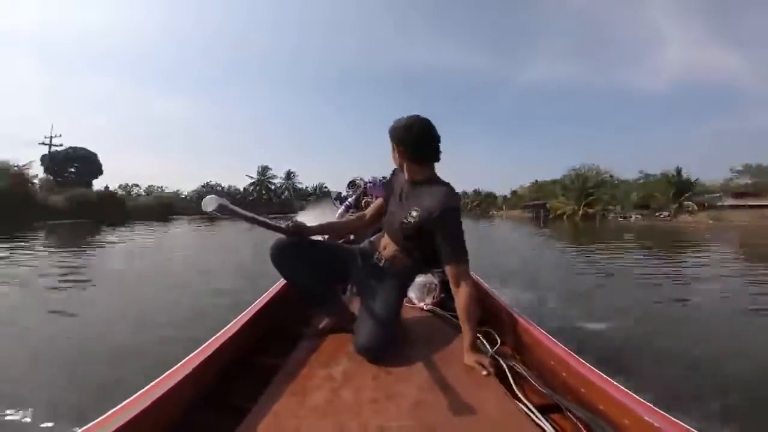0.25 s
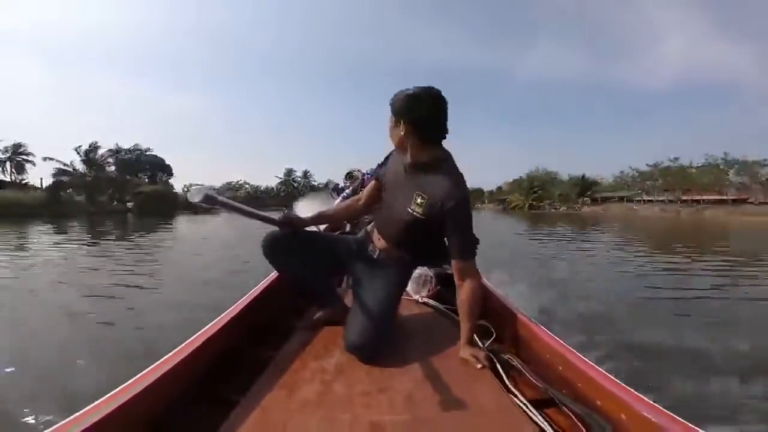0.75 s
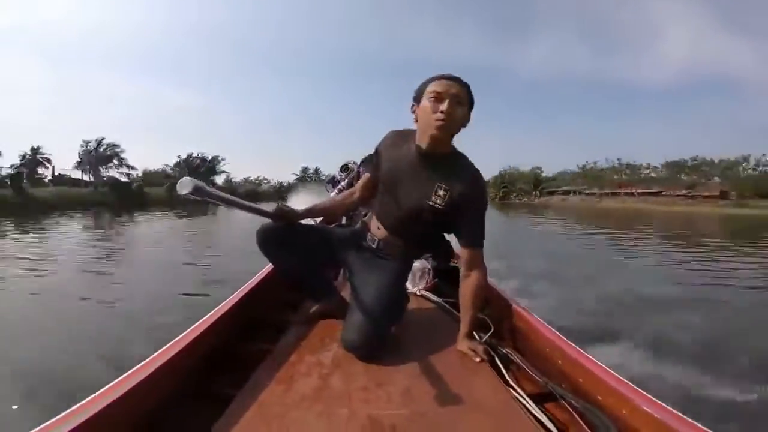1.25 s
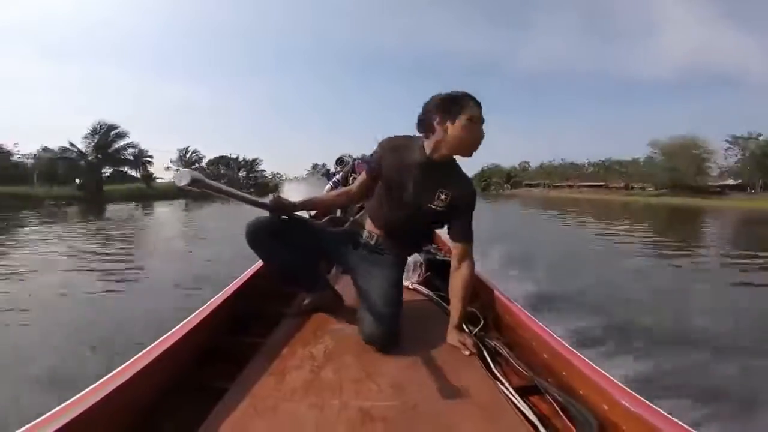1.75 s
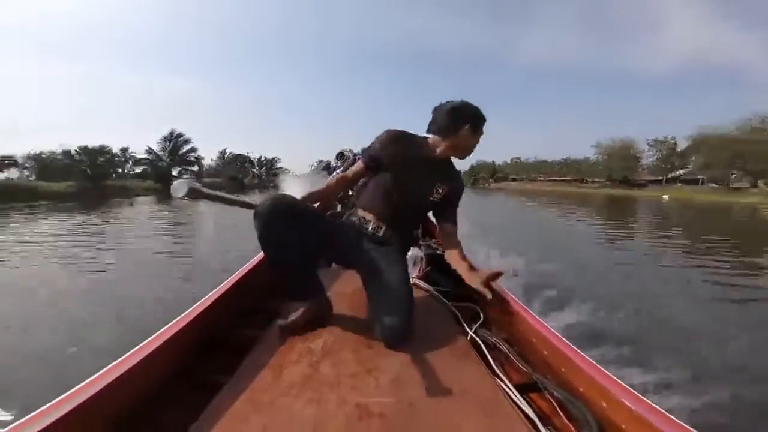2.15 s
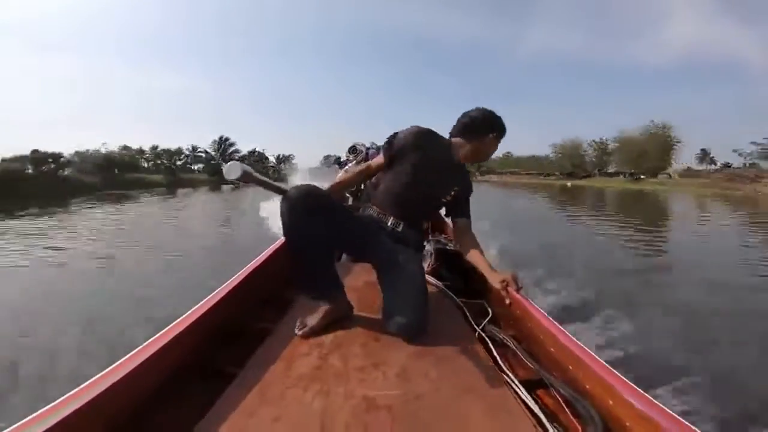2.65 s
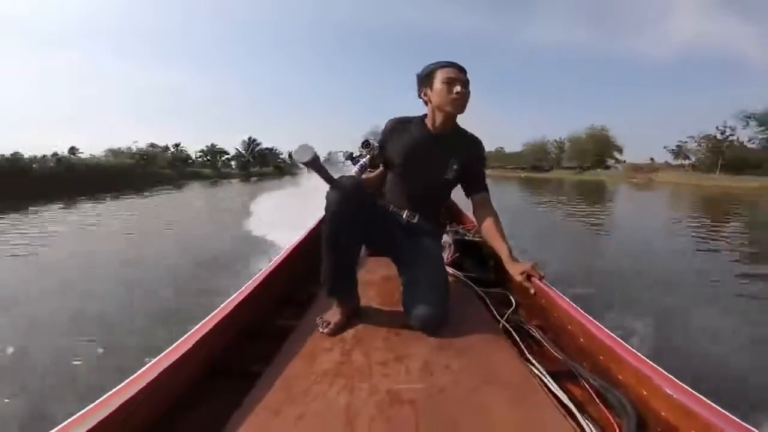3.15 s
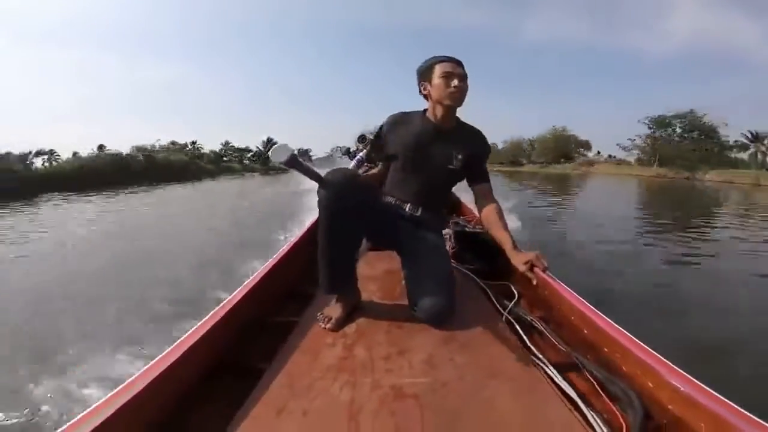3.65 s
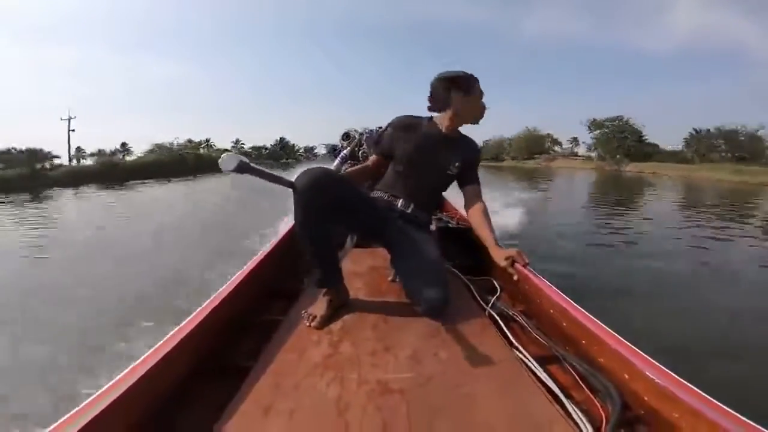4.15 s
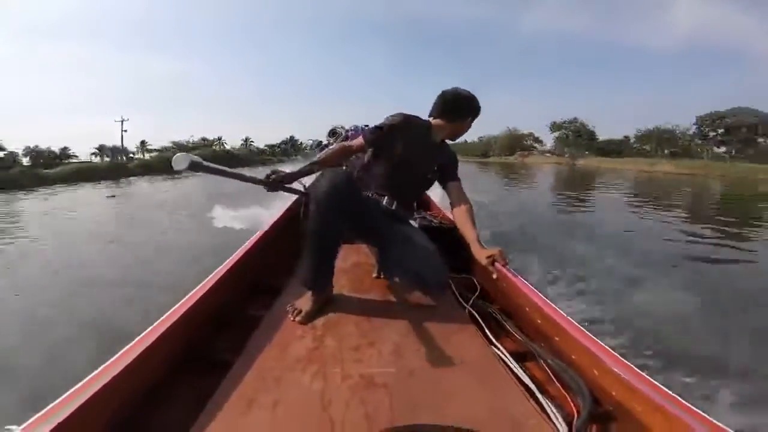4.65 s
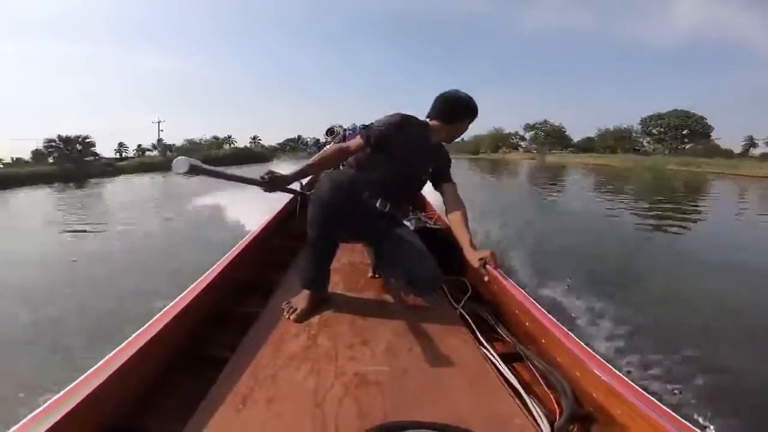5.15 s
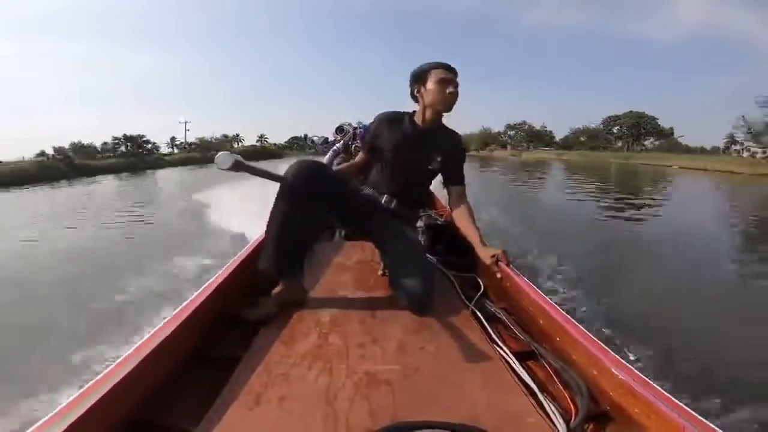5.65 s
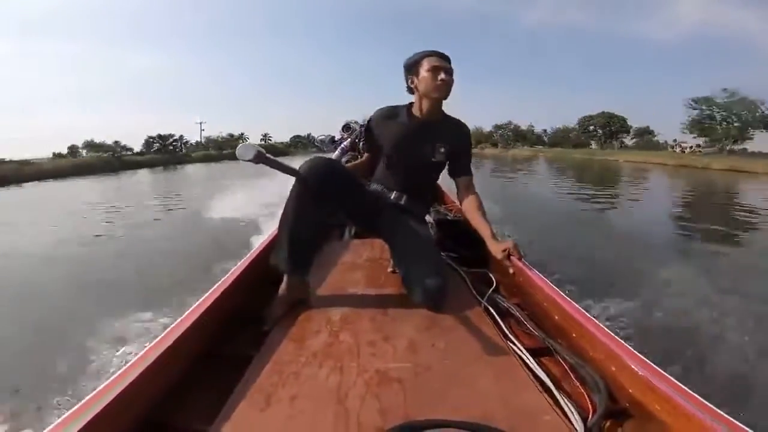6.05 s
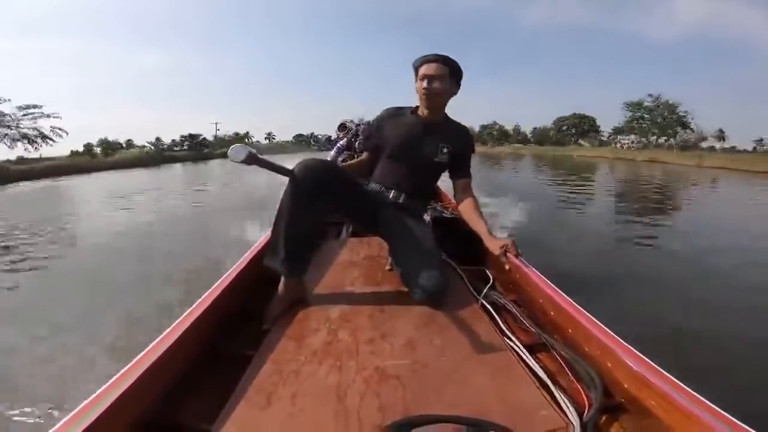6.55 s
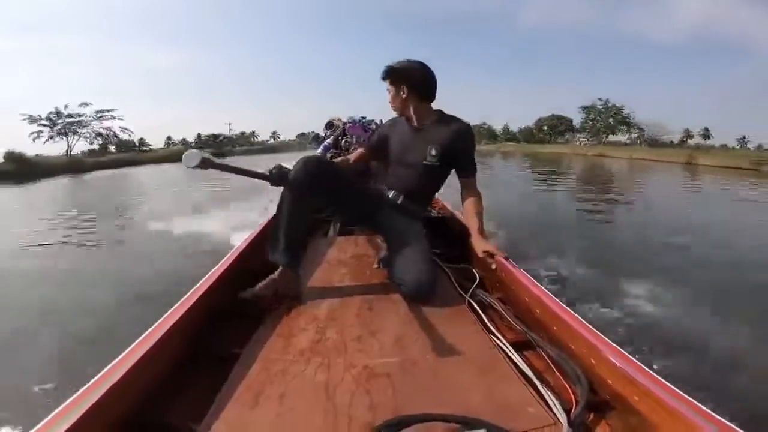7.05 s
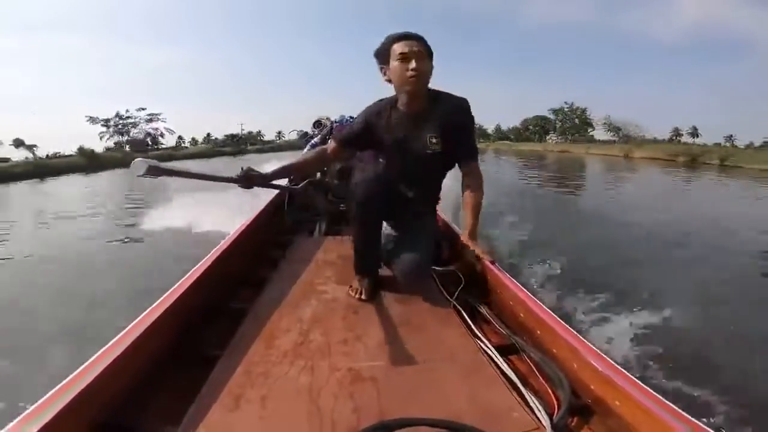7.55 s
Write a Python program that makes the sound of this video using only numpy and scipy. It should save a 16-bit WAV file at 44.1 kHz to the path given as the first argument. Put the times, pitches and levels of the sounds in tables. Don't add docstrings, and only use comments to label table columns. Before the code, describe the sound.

Outdoors on open water, the microphone sits a boat's length from the engine. Bright spray and sharp splashes fade to a steady rush while a whistling turbo coasts down. Then come about ten throbbing throttle blips, separated by gaps, with high airy whistles flaring and sagging. Low wind buffeting fills the pauses and ducks under the louder bursts.

```python
import sys
import numpy as np
from scipy import signal
from scipy.fft import rfft, irfft
from scipy.io import wavfile
from scipy.ndimage import uniform_filter1d

SR = 44100
rng = np.random.default_rng(int(sys.argv[2]) if len(sys.argv) > 2 else 0)


def store_wav(level_fs):
    pcm = np.round(np.clip(np.atleast_2d(level_fs), -1, 1) * 32767)
    wavfile.write(sys.argv[1], SR, pcm.T.astype(np.int16))


def magnitude_from_level(level_db):
    exponent = np.asarray(level_db, float) / 20
    return 10 ** exponent


N = 343539

# [time_s, level_db]
WIND_DOWN = [(.6, -39), (.84, -35), (1.08, -31.5), (1.54, -39), (1.8, -43.5), (2.33, -48), (2.43, -39.5),
             (2.75, -51.5), (2.95, -46)]
# [start_s, peak_s, peak_pitch_hz, climbing_level_db, lingering_level_db]
SPOOLS = [(2.94, 3.08, 5600, -45, -46), (3.19, 3.327, 6100, -40, -51), (3.578, 3.79, 6810, -41.5, -46),
          (4.12, 4.293, 6400, -40.5, -43), (4.678, 4.8, 5830, -52, -48), (5.538, 5.65, 5436, -43, -51),
          (5.961, 6.137, 5436, -41, -45), (6.31, 6.551, 5905, -39.5, -45), (6.72, 6.9, 5950, -37.5, -40),
          (7.03, 7.204, 5850, -34.5, -38), (7.48, 7.793, 5350, -37.5, -40)]
# [time_s, pitch_hz, level_db]
LARGE_WHEEL = [(3, 3190, -48), (3.14, 3260, -51), (3.64, 3610, -52), (3.78, 3970, -40.5), (4.02, 3790, -49),
               (4.07, 3660, -35), (4.3, 3765, -34), (4.5, 3575, -42.5), (4.6, 3500, -49.5),
               (5.65, 2943, -53), (5.9, 2994, -42), (6.12, 3100, -48.5), (6.35, 3123, -39.5),
               (6.6, 3100, -52), (6.8, 3576, -44), (7.1, 3290, -48), (7.5, 3120, -49.5), (7.79, 3140, -46)]
# [time_s, share_0_to_1]
LARGE_WHEEL_SMEAR = [(1.5, 0.66), (2.9, 0.4), (4.1, 0.4), (5.6, 0.65), (6.3, .75), (7.0, 1), (7.4, 0.48),
                     (7.79, .45)]
# [start_s, length_s, first_firing_hz, last_firing_hz, second_order_level_db]
BLIPS = [
    (2.862, 0.15, 76.3, 79.4, -23),
    (3.12, 0.25, 65.6, 83.3, -19.5),
    (3.58, .22, 72.9, 80.55, -20),
    (4.661, 0.15, 62.3, 68.7, -29),
    (5.42, 0.22, 55, 68.85, -24),
    (5.862, .29, 55.3, 72.7, -22),
    (6.292, .28, 57.84, 74.8, -21),
    (6.659, .24, 64.3, 73.5, -20.5),
    (7.039, 0.18, 59.3, 69.4, -24),
    (7.429, 0.35, 54.07, 63.8, -25.5),
]
# [frequency_hz, gain_db]
PIPE = [(40, 7.5), (70, 8), (135, 3), (205, 0.5), (270, -14.5), (400, -28.5), (560, -41.5), (760, -26),
        (1000, -47.5)]
# [frequency_hz, gain_db]
HULL_BOOM = [(55, -10), (63, -1), (78, -3.5), (84, 1.5)]
# [time_s, spray_level_db]
CHURN = [(0, -23), (.3, -27.5), (.7, -30.5), (1.15, -33.5), (1.6, -36), (2.2, -39.5), (2.86, -42),
         (3.45, -41), (3.78, -36), (4.0, -39), (4.35, -37), (4.9, -39.5), (5.42, -41.5), (6.09, -35),
         (6.5, -35), (6.72, -36.5), (7.15, -35), (7.79, -37)]
# [time_s, peak_level_db, time_to_fall_30_db_s]
SPLASHES = [(0.0962, -8.5, 0.021), (0.1984, -23, 0.036), (0.3461, -29, 0.2), (0.4663, -39, 0.037),
            (0.5851, -14, 0.03), (0.6848, -28, 0.04), (0.7724, -22, 0.025), (1.0869, -27, 0.028),
            (1.2306, -38, 0.03), (1.4994, -24, 0.025), (1.9954, -26.5, 0.041), (3.3189, -31, 0.036),
            (3.7394, -29, 0.032), (4.2617, -22, 0.025), (5.5694, -33, 0.063), (6.5101, -28, 0.045),
            (6.762, -51, 0.05), (7.1586, -28, 0.051), (7.5727, -22, 0.023)]
SLAPS_S = [
    1.03,
    1.55,
    5.02,
]
# [start_s, length_s, level_db]
MISTS = [
    (3.1, .75, -70),
    (5.3, 1., -69),
    (6.5, .1, -76),
    (7.2, .6, -70),
]
# [frequency_hz, density_db_per_hz]
RUSH = [(420, -36), (500, 0), (660, -3.5), (735, 3.5), (830, -3.5), (950, 2), (1300, -0.5), (1600, -2.5),
        (2500, -3), (3000, -4), (3700, -4.5), (5000, -12), (6500, -35.5)]
SPRAY = [(1470, -38.5), (2500, -15.5), (3390, -10.5), (3980, -1), (4350, -4.5), (6110, 3.5), (7000, -4),
         (7500, -7), (8250, -12), (10700, -36), (18200, -120)]
FIZZ = [(8520, -34), (8620, 4), (9500, -1.5), (10600, -2.5), (10750, -13), (11300, -21.5)]
TOP_FIZZ = [(10600, -34), (10750, 3.5), (12000, -4.5), (13300, -6), (13700, -13), (14500, -23),
            (15400, -45)]
MIST = [(10600, -28.5), (11500, -1), (13000, -0.5), (15000, -6.5), (15700, -25)]
# [time_s, rumble_level_db, large_eddy_level_db]
WIND = [(0, -15.5, -16), (.55, -16.5, -17.5), (.85, -15.5, -16), (1.1, -12.5, -18), (1.6, -14, -18.5),
        (2.3, -13, -22.5), (3.0, -13.5, -21.5), (3.3, -15, -18), (3.66, -14, -25), (4.1, -15.5, -19),
        (4.55, -19, -23), (4.7, -14, -24.5), (5.4, -19, -24.5), (6.25, -16.5, -17.5), (6.6, -18.5, -18.5),
        (7.1, -15.5, -23), (7.42, -18.5, -31), (7.79, -12, -20)]
# [start_s, length_s, level_db]
GUSTS = [(.45, 0.77, -39.5), (1.39, 0.8, -38.5), (2.702, 0.31, -41), (3.52, .5, -40), (4.317, .03, -40),
         (4.585, 0.039, -44), (4.839, 0.26, -45), (5.57, .05, -44.5), (6.2, 0.18, -39), (6.606, 0.022, -37),
         (6.776, .03, -39), (7.05, .15, -42), (7.65, .15, -37.5)]
# [frequency_hz, density_db_per_hz]
BUFFET = [(5, -36), (9, -23), (20, -6.5), (30, 6), (38, 2), (50, 1), (65, -13), (90, -8.5), (120, -54)]
RUMBLE = [(29, -47.5), (50, -0.5), (147, -0.5), (210, -8), (275, -17), (310, -17.5), (330, -38),
          (430, -57.5), (730, -120)]
FLAP = [(270, -18), (310, -3.5), (360, -2), (410, -2.5), (480, -16.5), (560, -8.5), (620, -50)]
# [frequency_hz, width_hz, depth_0_to_1]
NOTCHES = [(557, 79, 0.6), (569, 24, 0.6), (1006, 44, 0.4), (1133, 217, 0.66), (1116, 24, 0.48)]
# lower_hz, upper_hz
EDGE_HZ = (8280, 8600)

COAST_HZ, COAST_REST_HZ, COAST_PER_S = 7815, 987, 0.472
SAG_REST_HZ, SAG_PER_S, BLADE_RATIO = 3500, 0.59, 1.66
FLARE_DB_PER_S, FADE_DB_PER_S, SETTLE_DB_PER_S, IDLE_DB = 152, 69, 6, -52
SMEAR_COASTING, SMEAR_SPOOLING, HARD_HZ_PER_S = 0.42, 0.9, 1700
OPENING_DB = -6
CALM_DB = -39.5
RUSH_DB, RUSH_SHARE, FIZZ_DB, FIZZ_SHARE, TOP_DB, TOP_SHARE = -40, 0.3, -73, 0.2, -82, 0.15
RUSH_KICK_DB, RUSH_KICK_DB_PER_S, MIST_EDGE_DB_PER_S = 2, 17, 51
VENT_FIZZ_DB, VENT_TOP_DB, VENT_HOLD_S, VENT_DB_PER_S = -52.5, -60.5, 0.3, 22.5
BUFFET_LUMPS_DB, FLAP_DB, FLAP_LUMPS_DB, FLAP_EDGE_DB_PER_S = 2.8, -46.5, 0.2, 89


def turbo():
    t, first, last = np.arange(N) / SR, WIND_DOWN[0], WIND_DOWN[-1]
    coast_hz = COAST_REST_HZ + (COAST_HZ - COAST_REST_HZ) * np.exp(-COAST_PER_S * (t - first[0]))
    high_hz = BLADE_RATIO * coast_hz
    for start, peak, peak_hz, *_ in SPOOLS:
        rise = np.interp(t, [start, peak], [np.interp(start, t, high_hz), peak_hz])
        sag = SAG_REST_HZ + (peak_hz - SAG_REST_HZ) * np.exp(-SAG_PER_S * (t - peak))
        high_hz = np.where(t < start, high_hz, np.where(t < peak, rise, sag))
    climb_hz_per_s = np.gradient(high_hz) * SR
    smear = np.interp(climb_hz_per_s, [0, HARD_HZ_PER_S], [SMEAR_COASTING, SMEAR_SPOOLING])

    flare_db = loudest([(s, peak, db) for s, peak, _, db, _ in SPOOLS], FLARE_DB_PER_S, FADE_DB_PER_S)
    settled_db = loudest([(peak, peak, db) for _, peak, _, _, db in SPOOLS], FLARE_DB_PER_S, SETTLE_DB_PER_S)
    high_db = np.maximum(np.maximum(flare_db, settled_db), IDLE_DB)
    high_db = high_db + held(last[0], N / SR, 0, 150, 0)

    coasting = t < LARGE_WHEEL[0][0]
    low_hz, low_db = along(LARGE_WHEEL)
    coast_db = along(WIND_DOWN)[0] + held(first[0], N / SR, 0, 120, 0)
    low_hz = np.where(coasting, coast_hz, low_hz)
    low_db = np.where(coasting, coast_db, low_db)
    low = blade(low_hz, low_db, along(LARGE_WHEEL_SMEAR)[0], waver=0.0012, throb_db=1.7, smear_hz=120)
    high_smear = uniform_filter1d(smear, size=2000)
    return low + blade(high_hz, high_db, high_smear, waver=0.0025, throb_db=2.2, smear_hz=160)


def blade(hz, level_db, smear, waver, throb_db, smear_hz):
    smear = np.clip(smear, 0, 1)
    turn = np.exp(2j * np.pi * np.cumsum(hz * (1 + waver * wobble(32.0))) / SR)
    air = wobble(smear_hz) + 1j * wobble(smear_hz)
    tone = np.sqrt(2 * (1 - smear)) + np.sqrt(smear) * air
    throb = throb_db * (wobble(45) + 0.45 * wobble(8.4))
    return magnitude_from_level(level_db + throb) * (turn * tone).real


def exhaust():
    out, unrest, uneven = np.zeros(N), wobble(17), wobble(43)
    for start, length, first_hz, last_hz, db in BLIPS:
        at = np.arange(round(start * SR), min(round((start + length) * SR), N))
        done = (at / SR - start) / length
        hz = first_hz + (last_hz - first_hz) * done
        level_db = db + OPENING_DB * (1 - done)
        turns = np.cumsum(hz * (1 + 0.01 * unrest[at])) / SR + rng.random()
        orders = [magnitude_from_level(read(PIPE, k * hz)) * np.cos(2 * np.pi * k * turns) for k in range(1, 15)]
        boom = magnitude_from_level(np.interp(hz, *np.transpose(HULL_BOOM)))
        pulses = boom * orders[0] + sum(orders[1:])
        swell = magnitude_from_level(level_db + 0.55 * uneven[at]) * signal.windows.tukey(len(at), 0.3)
        out[at] -= np.sqrt(2) * swell * pulses
    return out


def water():
    spray_db = along(CHURN)[0]
    churn_db = spray_db - CALM_DB
    shoves = [row[0] + row[1] for row in BLIPS] + list(SLAPS_S)
    kick_db = loudest([(s, s, RUSH_KICK_DB) for s in shoves], RUSH_KICK_DB_PER_S, RUSH_KICK_DB_PER_S)
    rush_db = RUSH_DB + RUSH_SHARE * churn_db + np.maximum(kick_db, 0)
    vent_db = held(0, VENT_HOLD_S, 0, 0, VENT_DB_PER_S)
    mist_spans = [(s, s + length, db) for s, length, db in MISTS]
    mist_db = loudest(mist_spans, MIST_EDGE_DB_PER_S, MIST_EDGE_DB_PER_S)
    fizz_db = np.maximum(FIZZ_DB + FIZZ_SHARE * churn_db, VENT_FIZZ_DB + vent_db)
    top_db = np.maximum(TOP_DB + TOP_SHARE * churn_db, VENT_TOP_DB + vent_db)

    flare = np.zeros(N)
    t = np.arange(SR // 4) / SR
    for s, db, t30 in SPLASHES:
        part = flare[round(s * SR):][:len(t)]
        splash = magnitude_from_level(db - 60 * t / max(2 * t30, 0.01)) * (1 - np.exp(-t / 0.0089))
        part += splash[:len(part)]

    patter = magnitude_from_level(0.69 * wobble(6.8) + 0.47 * wobble(85))
    rush = magnitude_from_level(rush_db + 0.98) * noise(RUSH, size=512, patchy_db=1.18, flicker_db=0.81)
    steady = magnitude_from_level(spray_db - 1.34) * patter
    spray = (steady + 0.89 * flare) * noise(SPRAY, size=256, patchy_db=0.5, flicker_db=1.0)
    spray = signal.sosfilt(signal.ellip(10, 0.5, 50, EDGE_HZ[1] - 40, fs=SR, output="sos"), spray)
    fizz = magnitude_from_level(fizz_db + 4.0) * noise(FIZZ, size=512, patchy_db=1.0, flicker_db=0.2)
    top = magnitude_from_level(top_db + 4.3) * noise(TOP_FIZZ, size=512, patchy_db=1.0, flicker_db=2.0)
    mist = magnitude_from_level(mist_db) * noise(MIST, size=512, patchy_db=2.5, flicker_db=0.5)
    return rush + spray + (fizz + top + mist) * patter * (1 + 0.11 * flare / steady)


def wind(drone):
    rumble_db, eddy_db = along(WIND)
    buffet_db = eddy_db + BUFFET_LUMPS_DB * wobble(5.9)
    gust_spans = [(s, s + length, db) for s, length, db in GUSTS]
    gust_db = loudest(gust_spans, FLAP_EDGE_DB_PER_S, FLAP_EDGE_DB_PER_S)
    flap_db = np.maximum(gust_db, FLAP_DB) + FLAP_LUMPS_DB * wobble(3.2)
    drone_db = 10 * np.log10(abs(uniform_filter1d(drone ** 2, size=2200)) + 1e-9)
    duck_db = 0.5 * np.clip(drone_db + 30, 0, 12)
    buffet = magnitude_from_level(buffet_db - duck_db) * noise(BUFFET, size=4096, patchy_db=2.5, flicker_db=3.1)
    rumble = magnitude_from_level(rumble_db - duck_db) * noise(RUMBLE, size=2048, patchy_db=1.66, flicker_db=-0.55)
    flap = magnitude_from_level(flap_db) * noise(FLAP, size=1024, patchy_db=1.4, flicker_db=1.5)
    return buffet + rumble + flap


def noise(shape, size, patchy_db, flicker_db):
    frames, hz = 4 * N // size + 5, np.fft.rfftfreq(size, 1 / SR)
    a, b, patches = rng.standard_normal((frames, len(hz), 3)).T
    patches = evened(uniform_filter1d(uniform_filter1d(patches, size=8, axis=0), size=8, axis=1))
    flicker = evened(uniform_filter1d(rng.standard_normal(frames), size=6))
    level_db = read(shape, hz)[:, None] + patchy_db * patches + flicker_db * flicker
    z = (a + 1j * b) * magnitude_from_level(level_db)
    return evened(signal.istft(z, nperseg=size, noverlap=size - size // 4)[1][:N])


def wobble(rate_hz):
    settling = rng.standard_normal(N + SR)
    return evened(signal.lfilter(*signal.butter(2, rate_hz, fs=SR), settling)[SR:])


def evened(x):
    return x / np.sqrt(np.mean(x ** 2) + 1e-20)


def read(points, hz):
    f, value = np.transpose(points)
    return np.interp(np.log(hz + 1), np.log(f + 1), value, left=-120, right=-120)


def along(rows):
    s, *columns = np.transpose(rows)
    return [np.interp(np.arange(N) / SR, s, c) for c in columns]


def held(start, end, db, rise_db_per_s, fall_db_per_s, t=None):
    t = np.arange(N) / SR if t is None else t
    return db - rise_db_per_s * np.maximum(start - t, 0) - fall_db_per_s * np.maximum(t - end, 0)


def loudest(spans, rise_db_per_s, fall_db_per_s):
    t = np.arange(0, N + 64, 64) / SR
    start, end, db = np.transpose(spans)[:, :, None]
    levels = held(start, end, db, rise_db_per_s, fall_db_per_s, t)
    return np.interp(np.arange(N) / SR, t, levels.max(0))


def scene():
    drone = exhaust()
    return (drone + turbo() + wind(drone) + water())[None]


def thin_out(x, contrast, open_share):
    hz, t, z = signal.stft(x, SR, nperseg=2048, noverlap=1536)
    hz = hz[:, None]
    power = abs(z) ** 2 + 1e-16

    def around_db(bins, frames):
        return 10 * np.log10(uniform_filter1d(uniform_filter1d(power, size=bins, axis=1), size=frames, axis=2))

    local = uniform_filter1d(uniform_filter1d(power, size=9, axis=1), size=5, axis=2)
    z = z * np.where(hz > 430, np.clip(power / local, 0.01, 4) ** contrast, 1)
    z = z * np.where(hz < 1500, np.clip((around_db(2, 6) + 74) / 3, 0.05, 1), 1)
    z = z * np.where(hz > 11800, np.clip((around_db(40, 9) + 106.5) / 3, 0.03, 1), 1)
    chance = evened(uniform_filter1d(rng.standard_normal(len(t)), size=5))
    strip = (hz > EDGE_HZ[0]) & (hz < EDGE_HZ[1])
    z = z * np.where(strip, np.clip(open_share + 0.46 * chance, 0.02, 1), 1)
    return signal.istft(z, SR, nperseg=2048, noverlap=1536)[1][:, :N]


def roll_off(x):
    return signal.sosfilt(signal.butter(12, 15700, fs=SR, output="sos"), x)


def record(dry):
    hz = np.fft.rfftfreq(N, 1 / SR)
    notches = [1 - np.clip(depth, 0, 1) * np.exp(-((hz - f) / width) ** 2) for f, width, depth in NOTCHES]
    colour = np.prod(notches, axis=0)
    power_db = 10 * np.log10(uniform_filter1d(dry ** 2, size=900, axis=1) + 1e-9)
    over_db = uniform_filter1d(np.maximum(power_db + 11.5, 0), size=900, axis=1)
    levelled = dry / magnitude_from_level(0.83 * over_db)
    levelled = levelled / (1 + (abs(levelled) / 0.66) ** 4) ** 0.25
    thinned = thin_out(irfft(rfft(levelled) * colour, N), contrast=0.087, open_share=0.6)
    mix = thinned + 0.0015
    return roll_off(mix)


dry = scene()
out = record(dry)
store_wav(out)
```